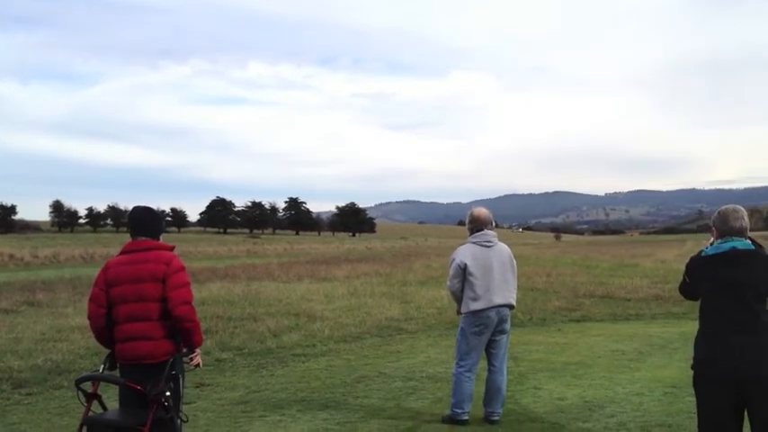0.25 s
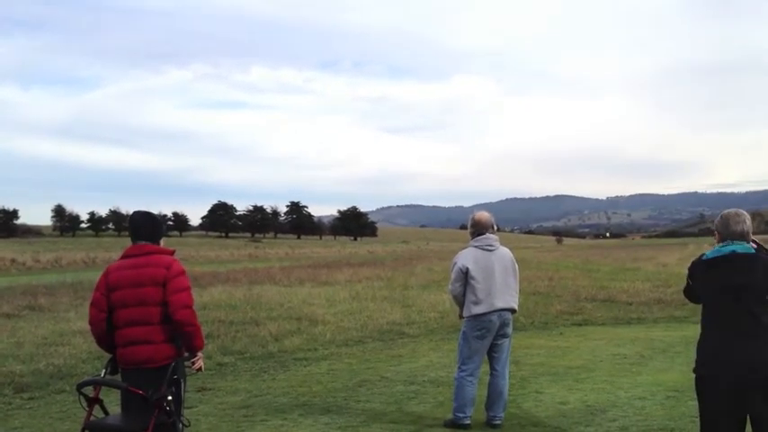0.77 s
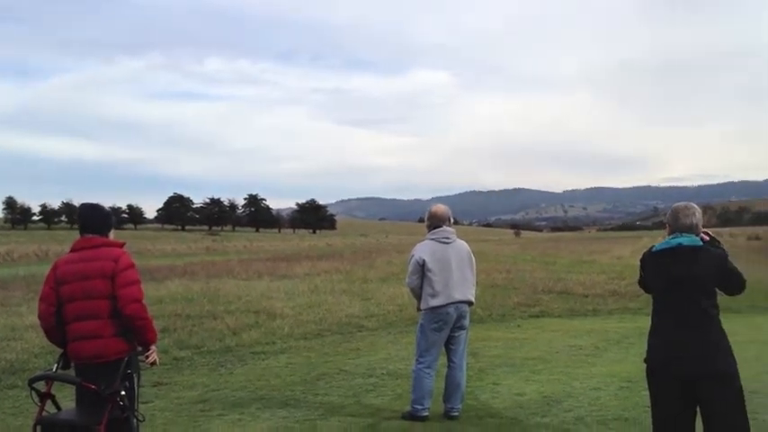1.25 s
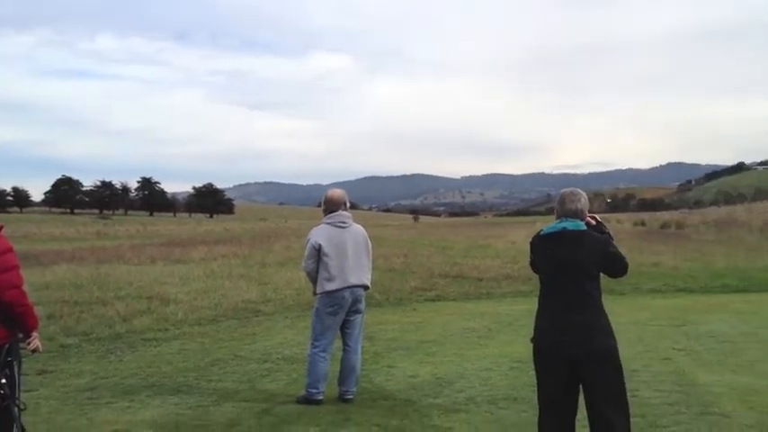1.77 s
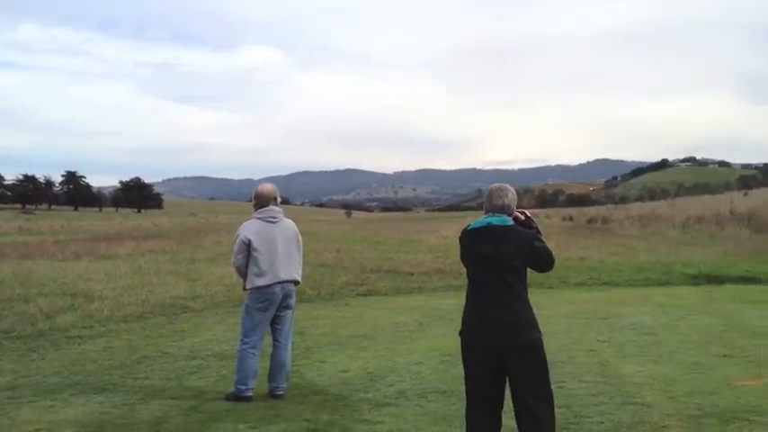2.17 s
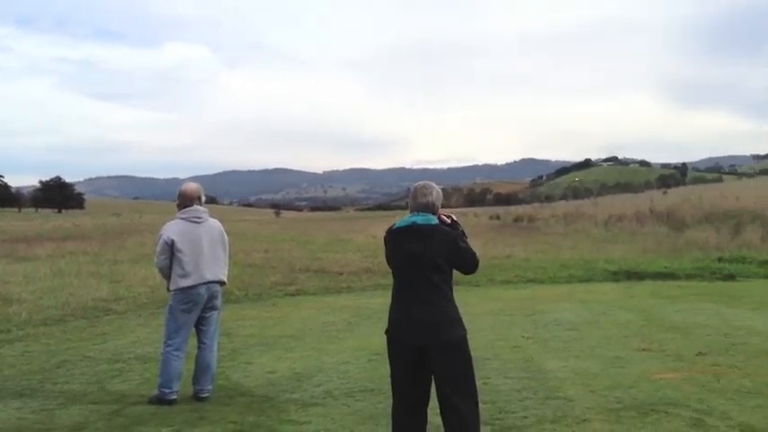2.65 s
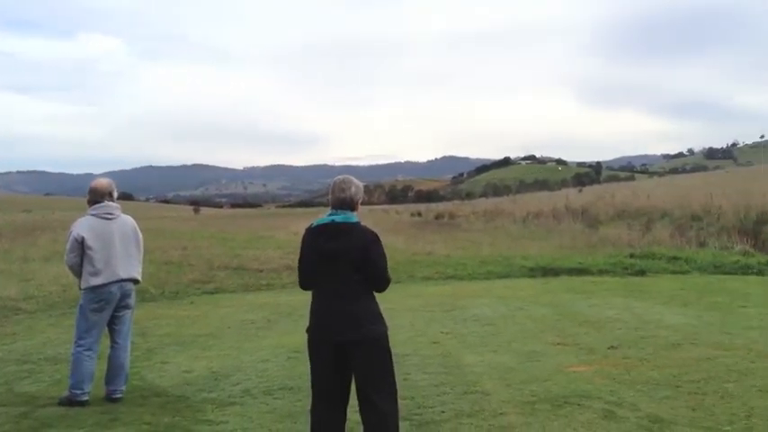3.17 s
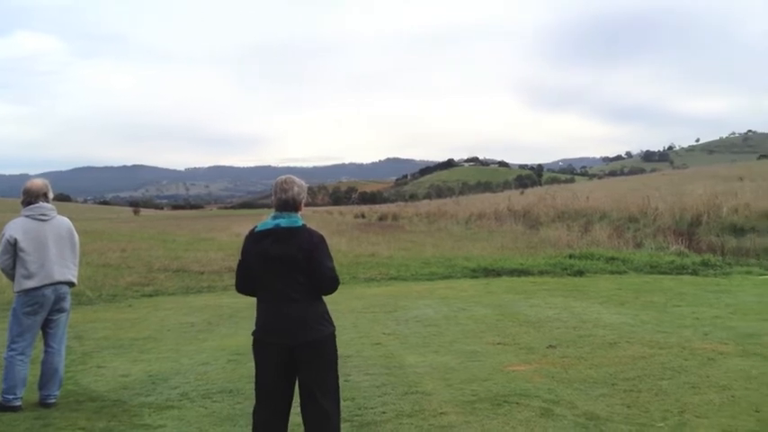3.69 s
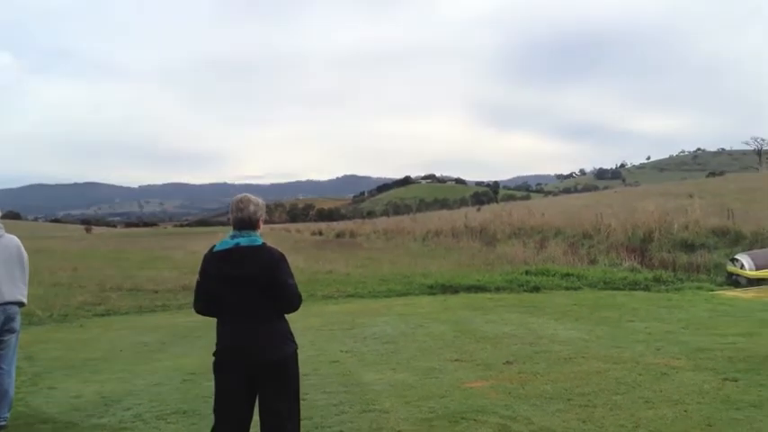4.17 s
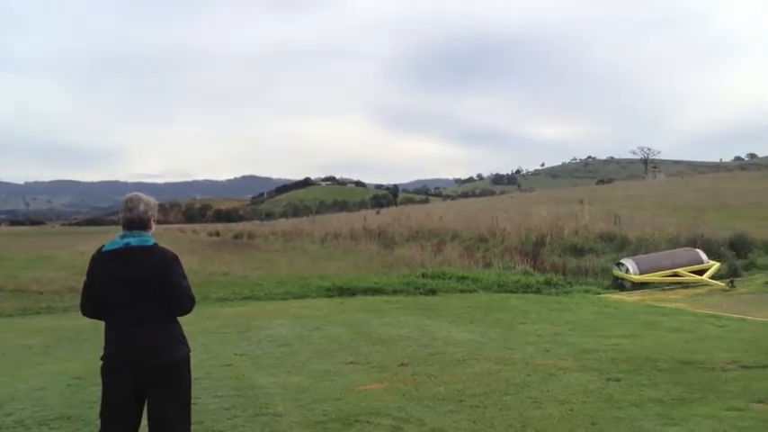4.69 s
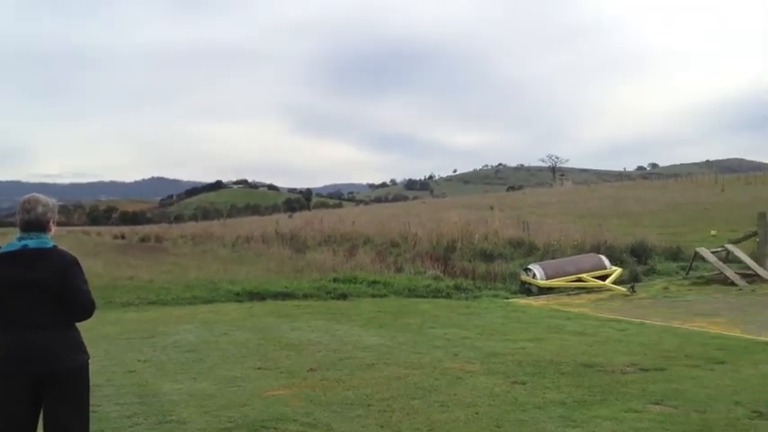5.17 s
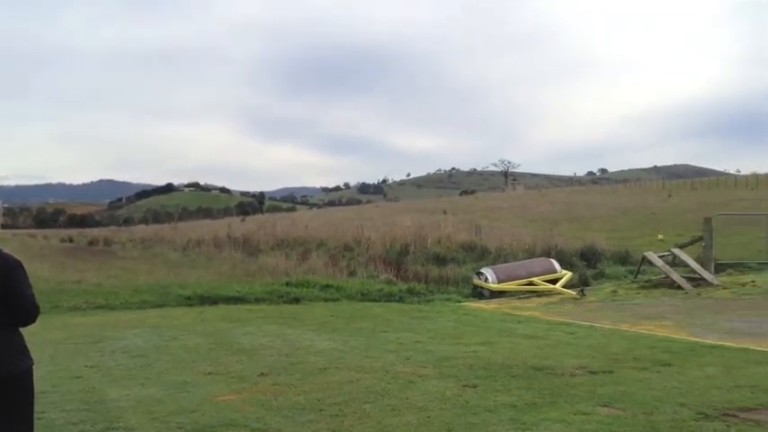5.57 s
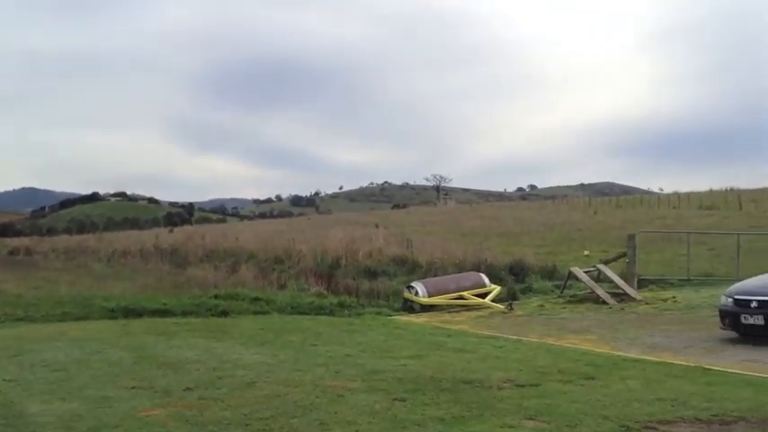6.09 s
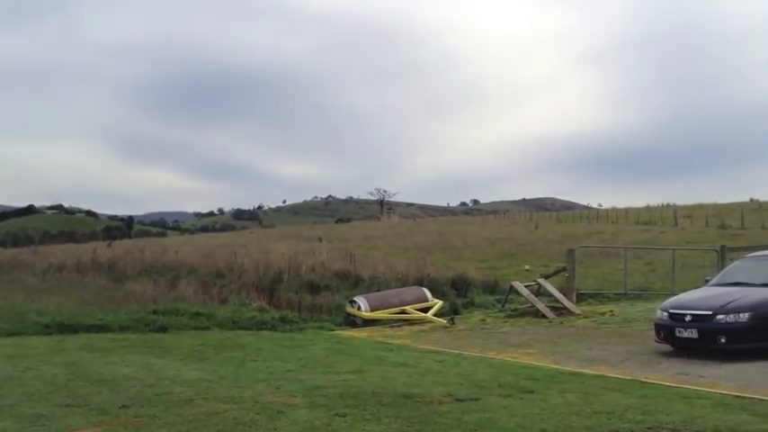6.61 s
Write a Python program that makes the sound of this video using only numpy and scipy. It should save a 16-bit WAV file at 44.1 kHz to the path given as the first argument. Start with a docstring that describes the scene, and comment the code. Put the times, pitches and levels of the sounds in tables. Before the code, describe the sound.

Evenly spaced low nasal moos, rough at both ends, sound outdoors while a thin whistle, distant small motor and airy hiss stay faint.

```python
"""A cow moos five times over an open field: folds drive a hum, throat and nose resonances, and rasp in the glides.
Every call follows one arch of rough rise, held hum and rough fall; a faint diffuse echo follows.
Behind it a small motor, perhaps of a model aircraft, whines at a multiple of its shaft rate; a thin sine whistles.
Soft far-off notes glide, and clothing gives ticks, a brush and a tap of shaped noise.
Hiss, a low drone and an airy rush, all filtered noise, fill the background."""
import sys
import numpy as np
from scipy import signal
from scipy.fft import rfft, irfft
from scipy.io import wavfile
from scipy.ndimage import uniform_filter1d

SR = 44100
rng = np.random.default_rng(int(sys.argv[2]) if len(sys.argv) > 2 else 0)


def unload_audio(sound):
    """Save the sound as a 16-bit wav file, at the path given as the first command line argument."""
    columns = np.transpose(np.atleast_2d(sound))
    # keep every value between -1 and 1, then stretch to whole-number steps
    steps = np.round(np.clip(columns, -1, 1) * 32767)
    wavfile.write(sys.argv[1], SR, steps.astype(np.int16))


N = 302085
TIME = np.arange(N) / SR


def amp(db):
    """Converts decibels to gain."""
    return 10 ** (np.asarray(db) / 20)


def unit(x):
    """Scales to rms 1."""
    return x / np.sqrt(np.mean(x ** 2) + 1e-20)


def follow(rows, t):
    """Interpolates each column of a curve table at the times t."""
    time_s, *columns = np.transpose(rows)
    return [np.interp(t, time_s, column) for column in columns]


def colour(points, hz):
    """Gain of a (Hz, dB) curve at the given frequencies, interpolated over log frequency."""
    point_hz, db = np.transpose(points)
    return amp(np.interp(np.log(hz + 1), np.log(point_hz + 1), db))


def noise(points, size):
    """Noise of rms 1 with the given spectrum."""
    gain = colour(points, np.fft.rfftfreq(size, 1 / SR))
    return unit(irfft(rfft(rng.standard_normal(size)) * gain, size))


def wander(rate_hz, size):
    """Random drift of rms 1: noise that falls off steeply above rate_hz."""
    hz = np.fft.rfftfreq(size, 1 / SR)
    return unit(irfft(rfft(rng.standard_normal(size)) / (1 + (hz / rate_hz) ** 4), size))


def resonate(x, hz, width_hz):
    """A steep resonance, fixed or moving: shifts hz down to 0, low-passes, shifts back."""
    turn = np.exp(2j * np.pi * np.cumsum(hz * np.ones(len(x))) / SR)
    r = np.exp(-np.pi * width_hz / SR)
    smooth = signal.lfilter([(1 - r) ** 2], [1, -2 * r, r * r], x / turn + 1e-18)
    return 2 * (turn * smooth).real


def steady(x, size=1300):
    """Holds the short-time rms at 1."""
    return x / np.sqrt(abs(uniform_filter1d(x ** 2, size)) + 1e-12)


def add(mix, start_s, sound):
    """Mixes a sound in at start_s, or at 0 if that is negative."""
    part = mix[max(round(start_s * SR), 0):][:len(sound)]
    part += sound[:len(part)]


def swell(t, level_db, attack_s, full_s, until_s, release_s):
    """A rounded attack, a hold and a release, in dB; attack and release each span 20 dB."""
    attack = (np.maximum(full_s - t, 0) / attack_s) ** 2
    release = (np.maximum(t - until_s, 0) / release_s) ** 2
    return level_db - 20 * attack - 20 * release


def bump(t, at_s, width_s):
    """A smooth bump of height 1."""
    return np.exp(-((t - at_s) / width_s) ** 2)


def folds(hz, rough, jitter=.045, count=16, uneven_db=3.2):
    """Harmonics of the vocal folds, whose period stumbles as they grow rough: frequencies, waves, turns."""
    turns = np.cumsum(hz * (1 + jitter * rough * wander(130, len(hz)))) / SR
    k = np.arange(1, count + 1)[:, None]
    # each overtone has its own phase and swells and sinks by itself
    swells = amp(uneven_db * (k > 1) * np.array([wander(8, len(hz)) for _ in k]))
    waves = np.sqrt(2) * swells * np.cos(2 * np.pi * (k * turns + rng.random(k.shape)))
    return k * hz, waves, turns


# Parts of the voice, timed from the start of a moo.
# Each holds: base level in dB, attack in s, full from in s, held until in s, release in s.
HUM_SWELL = (-31.4, .225, .475, .83, .108)
THROAT_SWELL = (-53.5, .31, .48, .89, .06)
NOSE_SWELL = (-57.5, .2, .32, .81, .145)
# The voice catches twice in every moo.
# Each holds: time in s, width in s, dip of the hum in dB, of the throat in dB, of the nose in dB.
CATCH_RISING = (.39, .02, 6, 6, 6)
CATCH_FALLING = (.8, .014, 0, 8, 7)
SAG_AT_S, SAG_WIDTH_S = .72, .125  # the hum sags in mid call
NOSE_OPEN_DB, NOSE_OPEN_S = 12, .025
HONK_AT_S, HONK_WIDTH_S, HONK_DB = .358, .018, 7  # a short honk tops the rise


def effort(t, opens_s, sag_db, waver_db=2.5, shift_db=6, shift_before_s=.05, shift_width_s=.025):
    """Levels of hum, throat and nose, and opening of the nose 0-1; the throat dips just before it opens."""
    opened = .5 + .5 * np.tanh((t - opens_s) / NOSE_OPEN_S)
    hum_db = swell(t, *HUM_SWELL) - sag_db * bump(t, SAG_AT_S, SAG_WIDTH_S)
    throat_db = swell(t, *THROAT_SWELL) - shift_db * bump(t, opens_s - shift_before_s, shift_width_s)
    nose_db = swell(t, *NOSE_SWELL) + NOSE_OPEN_DB * opened + HONK_DB * bump(t, HONK_AT_S, HONK_WIDTH_S)
    # throat and nose waver until the nose opens
    throat_db = throat_db + waver_db * (1 - opened) * wander(12, len(t))
    nose_db = nose_db + waver_db * (1 - opened) * wander(12, len(t))
    dips = 0
    for at_s, width_s, *dips_db in (CATCH_RISING, CATCH_FALLING):
        dips = dips + np.outer(dips_db, bump(t, at_s, width_s))
    return (*(np.array([hum_db, throat_db, nose_db]) - dips), opened)


# Pitch of the second strand. Each row: time in the moo in s, share of the held pitch.
STRAND_PITCH = [(.05, .4), (.16, .54), (.21, .65), (.28, .78), (.37, .94), (.55, .993), (.8, 1), (.84, .92),
                (.88, .66), (.96, .35)]
# Its harmonics. Each row: frequency in Hz, relative level in dB.
STRAND_OVERTONES = [(100, -16), (140, -4), (180, -6), (230, 6), (270, 14), (325, 2), (400, -4), (620, -6),
                    (1000, -15), (1500, -9), (2000, -14), (3000, -26), (4200, -40)]
# Its fade. Each row: time in the moo in s, relative gain.
STRAND_FADE = [(.1, 0), (.2, .85), (.36, .7), (.45, .3), (.78, .3), (.86, 1.3), (.94, .15)]


def second_strand(t, held_hz, rough):
    """A weaker voice strand, off the main pitch in rise and fall, nearly merging on the held note."""
    share = follow(STRAND_PITCH, t)[0]
    hz, waves, _ = folds(held_hz * share, rough)
    gain = amp(-61) * share ** .9 * follow(STRAND_FADE, t)[0]
    return gain * (colour(STRAND_OVERTONES, hz) * waves).sum(0)


# Arch of every moo. Each row: time in the moo in s, share of the held pitch, roughness 0-1.
ARCH = [(0, .25, .6), (.2, .52, .68), (.27, .79, .66), (.35, .93, .4), (.42, .968, .14), (.5, .985, .05),
        (.62, .997, .02), (.79, 1, .03), (.835, .995, .27), (.895, .97, .27), (.94, .88, .45), (1, .5, .8)]
# Main strand. Each row: frequency in Hz, relative level in dB.
OVERTONES = [(250, -30), (420, .5), (620, 4), (830, -14), (1040, 2), (1250, -14), (1460, 2.5), (1680, 2),
             (1880, -1), (2100, -9.5), (2400, -17), (2700, -18), (3200, -23), (4200, -34)]
# Rasp before its brightness tilt. Each row: frequency in Hz, relative level in dB per Hz.
RASP = [(100, -38), (300, -13), (500, -16), (780, -6), (1020, -13), (1400, 2), (1900, -4), (2600, -8),
        (3300, -20), (4300, -29), (5200, -42), (9000, -48)]
# Each holds: base level in dB, attack in s, full from in s, held until in s, release in s.
OVERTONE_SWELL = (-61.3, .4, .5, .87, .08)
RASP_SWELL = (-54, .205, .28, .88, .095)
HONK_RING_HZ, HONK_RING_DB = 1520, -54  # the honk also rings above the nose resonance
PUSH_AT_S, PUSH_WIDTH_S, PUSH_DB = .86, .045, 2  # a last push before the end
MUFFLE_ABOVE_HZ, MUFFLE_DB = 950, 4  # upper overtones are muffled until the nose opens


def moo(start_s, held_hz, opens_s, sag_db, throat_gain_db, over_db, rasp_db, bright_db):
    """A closed-mouth call: a strong hum, overtones through throat and nose, and rasp in the glides."""
    t = np.arange(max(-start_s, 0), 1, 1 / SR)
    hum_db, throat_db, nose_db, opened = effort(t, opens_s, sag_db)
    share, rough = follow(ARCH, t)
    rough = np.clip(rough, 0, 1)
    hz, waves, turns = folds(held_hz * share, rough)
    # the chest only carries the fundamental once it has risen into its range
    hum = amp(hum_db) * waves[0] / (1 + (165 / hz[0]) ** 12)

    # air escapes in one puff a cycle; brightness tilts it from 1300 Hz to 2.2 times that
    air = noise([(f, db + bright_db * np.log2(np.clip(f / 1300, 1, 2.2))) for f, db in RASP], len(t))
    puff_shape = .4 + np.exp(-(turns % 1) / .25)
    puffs = unit(air * puff_shape * amp(2 * wander(25, len(t))))
    rasp = amp(swell(t, *RASP_SWELL) + rasp_db) * (.1 + .9 * rough) * puffs

    drive = waves[1:].sum(0) + 5 * rough * puffs
    throat = amp(throat_db + throat_gain_db) * steady(resonate(drive, 825, 130))
    nose = amp(nose_db) * steady(resonate(drive, 1275, 130))
    honk_level = amp(HONK_RING_DB) * bump(t, HONK_AT_S, HONK_WIDTH_S)
    honk = honk_level * steady(resonate(drive, HONK_RING_HZ, 260))

    muffle_db = MUFFLE_DB * (1 - opened) / (1 + (MUFFLE_ABOVE_HZ / hz) ** 20)
    overtones = (colour(OVERTONES, hz) * amp(-muffle_db) * waves).sum(0)
    overtones *= amp(swell(t, *OVERTONE_SWELL) + over_db) * np.sqrt(1 - rough ** 2)

    push = amp(PUSH_DB * bump(t, PUSH_AT_S, PUSH_WIDTH_S))
    voice = hum + nose + honk + push * (throat + overtones + rasp) + second_strand(t, held_hz, rough)
    return voice * np.interp(t, [.96, 1], [1, 0])


# Each row: start in s (negative = already under way), held pitch in Hz, nose opening in s after the start,
# sag of the hum in dB, gains of throat, overtones and rasp in dB, brightness of the rasp in dB per octave.
MOOS = [(-.634, 208.2, .6, 10, .5, 0, -1, -3), (1.0, 208.5, .62, 6.5, -2, -2.5, -.5, 0),
        (2.753, 209.9, .595, 10.5, 0, -.5, -1.5, 1), (4.385, 209.8, .54, 4.5, 1, 2.5, 3.5, 4),
        (6.255, 209.5, .53, 7, 0, 1, -.5, -1)]


def cow():
    """The five calls, each from the same voice."""
    out = np.zeros(N)
    for row in MOOS:
        add(out, row[0], moo(*row))
    return out


def echo(x, level_db=-33, t60_s=1.2, onset_s=.06):
    """A faint tail scattered back by trees and slopes: decaying noise as impulse response."""
    t = np.arange(SR) / SR
    tail = noise([(200, -7), (800, -2), (1400, 0), (3000, 0), (8000, -10)], SR)
    tail = tail * np.minimum(t / onset_s, 1) * amp(-60 * t / t60_s)
    return amp(level_db) * signal.oaconvolve(x, tail / np.linalg.norm(tail))[:N]


# Each row: time in s, shaft turns per second, base wobble of the whine within each turn in radians.
SHAFT = [(.3, 98.6, .4), (.5, 102.4, .4), (.75, 107.2, .55), (1.0, 109.2, .9), (1.3, 111.7, .7),
         (1.9, 110.2, .8), (2.1, 114, .8), (2.35, 120.6, .6), (3.1, 120.7, .35), (3.82, 120.3, .5),
         (4.35, 129.6, .6), (5.0, 133.8, .6), (5.85, 132, .9), (6.25, 131.1, 2.1), (6.85, 130.7, 2.4)]
# Each row: time in s, level of the whine in dB before gain_db.
WHINE = [(0.35, -89), (0.53, -65), (0.91, -56), (1.12, -62), (1.45, -60), (2.1, -72), (2.46, -72),
         (2.62, -63), (2.71, -67), (3.3, -61), (3.5, -66), (4.08, -64), (4.3, -72), (4.45, -66),
         (4.59, -77), (5.75, -76), (5.78, -73), (6.8, -79)]
WHINE_ORDER = 36  # whine cycles per shaft turn


def motor(rush_db=-17, throb=.38, gain_db=-.5):
    """A whine that wobbles and throbs once a shaft turn, in a narrow band of rushing air."""
    shaft_hz, wobble = follow(SHAFT, TIME)
    angle = 2 * np.pi * np.cumsum(shaft_hz * (1 + .0005 * wander(25, N))) / SR
    wobble = wobble * amp(1.2 * wander(6, N))
    whine = (1 - throb * np.cos(angle)) * np.sin(WHINE_ORDER * angle + wobble * np.sin(angle))
    rush = amp(rush_db) * unit(resonate(rng.standard_normal(N), shaft_hz * WHINE_ORDER, 800))
    level = amp(follow(WHINE, TIME)[0] + gain_db + 1.2 * wander(24, N))
    fade_in = np.clip(TIME / WHINE[0][0], 0, 1) ** 2
    return level * (steady(whine) + rush) * fade_in


# Each row: time in s, mean pitch in Hz.
WHISTLE_HZ = [(0, 7540), (1.3, 7524), (3.3, 7462), (4.9, 7457), (6.15, 7353), (6.85, 7322)]
# Each row: time in s, level in dB before gain_db.
WHISTLE_DB = [(0.0, -78), (0.11, -83), (0.55, -68), (0.91, -80), (0.98, -65), (1.32, -71), (1.36, -77),
              (1.8, -78), (1.89, -71), (2.2, -63), (2.63, -60), (2.71, -68), (3.07, -60), (4.18, -71),
              (4.22, -77), (4.47, -61), (4.68, -70), (4.85, -65), (4.96, -79), (5.23, -64), (5.51, -63),
              (5.76, -73), (5.93, -62), (6.27, -57), (6.7, -69), (6.8, -77)]


def whistle(gain_db=4):
    """One thin sine, slightly unsteady in pitch and level."""
    hz, db = follow(WHISTLE_HZ, TIME) + follow(WHISTLE_DB, TIME)
    level = amp(db + gain_db + 1.4 * wander(26, N))
    return level * np.sin(2 * np.pi * np.cumsum(hz + 5 * wander(40, N)) / SR)


# Faint far-off notes, the high ones perhaps birds.
# Each row: start in s, length in s, first pitch in Hz, last pitch in Hz, level in dB before gain_db.
GLIDES = [(.42, .18, 1530, 1440, -73), (2.55, .24, 1590, 1620, -66), (2.57, .2, 2690, 2650, -70),
          (3.18, .17, 2400, 2130, -67), (3.68, .22, 2240, 2290, -67), (3.8, .14, 2260, 2090, -70),
          (3.88, .22, 2270, 2260, -71), (3.76, .26, 2030, 1980, -73), (4.34, .22, 2520, 2750, -71),
          (4.82, .4, 3340, 3370, -73), (5.89, .07, 3400, 3100, -75), (5.93, .1, 2700, 2550, -78),
          (5.9, .5, 300, 340, -75), (4.3, .22, 235, 265, -73)]


def glides(blur=.007, gain_db=2.5):
    """Soft gliding sines, their pitch jittered as if blurred by distance."""
    out = np.zeros(N)
    for start_s, length_s, first_hz, last_hz, db in GLIDES:
        size = int(length_s * SR)
        hz = np.linspace(first_hz, last_hz, size) * (1 + blur * wander(70, size))
        note = np.sin(2 * np.pi * np.cumsum(hz) / SR) * signal.windows.tukey(size, .7)
        add(out, start_s, amp(db + gain_db) * note)
    return out


# Each row: time in s, level in dB before tick_gain_db.
TICKS = [(0.5621, -57), (0.6639, -63), (0.6894, -66), (1.1643, -59), (1.268, -60), (1.4282, -60),
         (1.4466, -60), (1.5319, -57), (1.704, -60), (1.7908, -55)]
# Spectrum of ticks and brush. Each row: frequency in Hz, relative level in dB per Hz.
CLOTH = [(1000, -8), (2200, 2), (4000, -4), (6500, 0), (9000, -7), (13000, -10), (16000, -18)]


def clothing(brush_s=3.31, brush_width_s=.11, tick_decay_s=.007, tick_gain_db=-4.5, tap_s=.665, tap_db=-55):
    """Faint ticks and one soft brush of fabric gate the same noise; one duller tap has its own."""
    level = amp(-65) * bump(TIME, brush_s, brush_width_s)
    t = np.arange(2000) / SR
    for start_s, db in TICKS:
        add(level, start_s, amp(db + tick_gain_db) * np.exp(-t / tick_decay_s))
    out = level * noise(CLOTH, N) * amp(2 * wander(60, N))
    tap = noise([(150, -15), (500, -4), (1300, 0), (2300, -3), (4000, -16), (9000, -30)], len(t))
    add(out, tap_s, amp(tap_db) * np.exp(-t / .005) * tap)
    return out


# Still air and hiss. Each row: frequency in Hz, relative level in dB per Hz.
AIR = [(25, -26), (48, -20), (66, -3), (80, -5), (130, 0), (250, 1), (420, -1), (700, 2), (1200, -3),
       (2200, -5), (3200, -9.5), (4000, -6.5), (5000, -11.5), (6500, -10), (10000, -16.5), (15000, -10.5)]
AIR_DB = -67
# Low drone. Each row: time in s, level in dB.
DRONE = [(0, -71), (.9, -70), (2.3, -67), (3.9, -66), (4.2, -71), (5.2, -67), (5.6, -73), (6.15, -64)]
# Airy rush. Each row: time in s, level in dB.
RUSH = [(0, -79), (1, -82), (2.25, -74), (2.45, -77), (2.65, -70), (3.9, -68), (4.17, -78), (4.4, -68),
        (5.5, -80), (6.3, -78)]


def field():
    """Even hiss, a low distant drone and an airy rush in three drifting bands that comes and goes."""
    drone_db, rush_db = follow(DRONE, TIME) + follow(RUSH, TIME)
    drone_spectrum = [(60, -50), (120, -20), (160, -7), (200, 0), (240, -12), (330, -20), (600, -50), (3000, -90)]
    drone = amp(drone_db) * noise(drone_spectrum, N)
    rush = np.zeros(N)
    for hz, width_hz in [(1530, 400), (2250, 550), (2700, 400)]:
        rush += resonate(rng.standard_normal(N), hz * (1 + .04 * wander(2.5, N)), width_hz)
    return amp(AIR_DB) * noise(AIR, N) + drone + amp(rush_db) * unit(rush)


def scene():
    """The cow in front of the open field."""
    calls = cow()
    return (calls + echo(calls) + motor() + whistle() + glides() + clothing() + field())[None]


EDGE_HZ = 15350


def record(dry):
    """The band limit of the recorder: a steep low-pass at EDGE_HZ."""
    lowpass = signal.firwin(511, EDGE_HZ, window=("kaiser", 9), fs=SR)
    return signal.oaconvolve(dry, lowpass[None], "same")


dry = scene()
out = record(dry)
unload_audio(out)
```